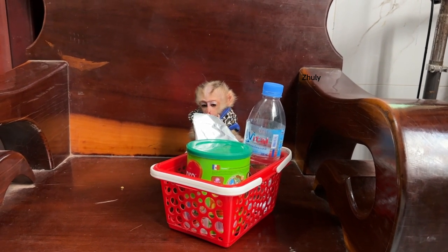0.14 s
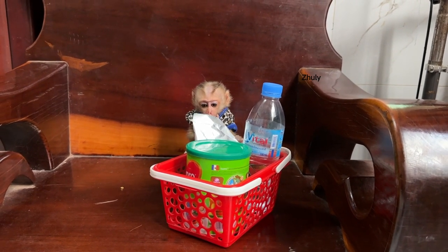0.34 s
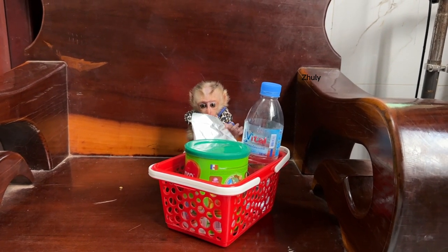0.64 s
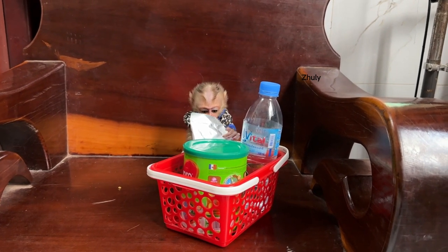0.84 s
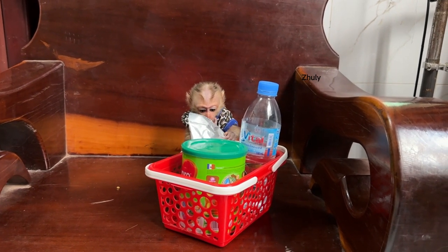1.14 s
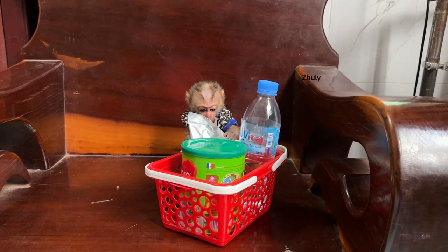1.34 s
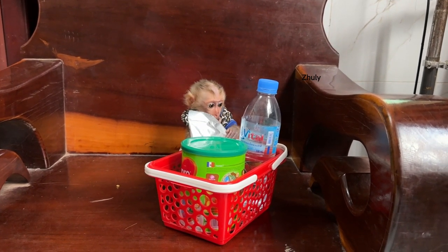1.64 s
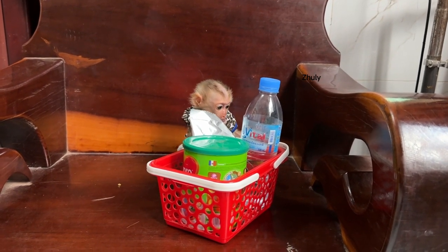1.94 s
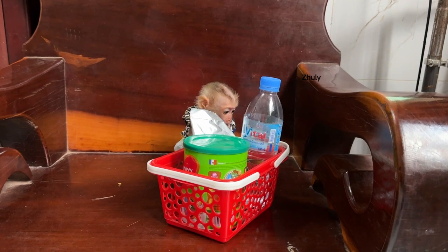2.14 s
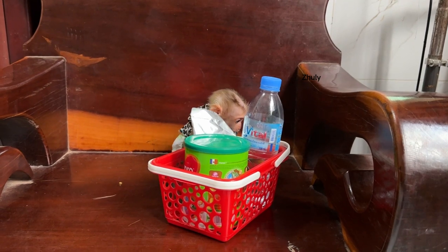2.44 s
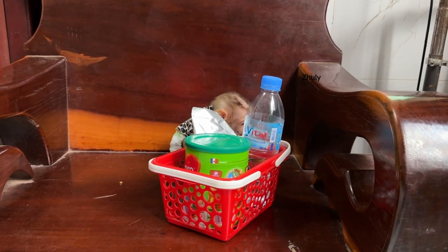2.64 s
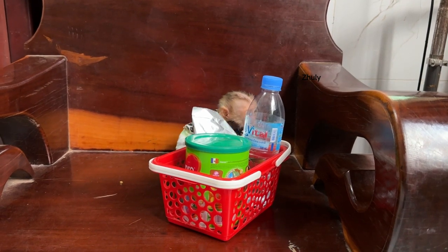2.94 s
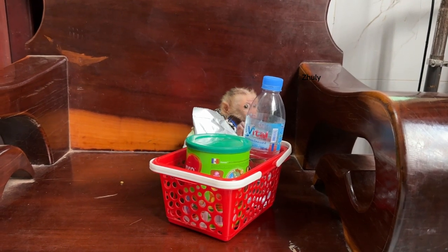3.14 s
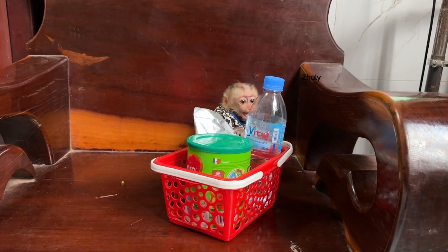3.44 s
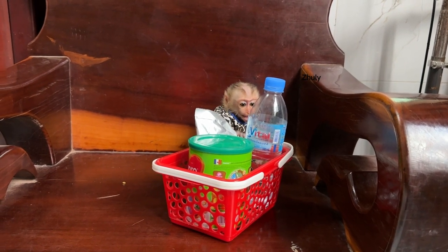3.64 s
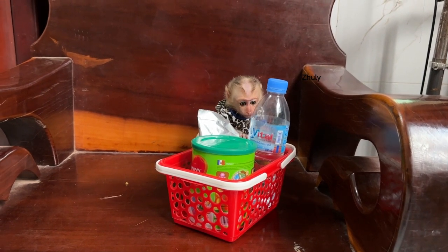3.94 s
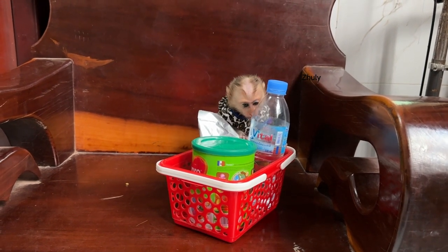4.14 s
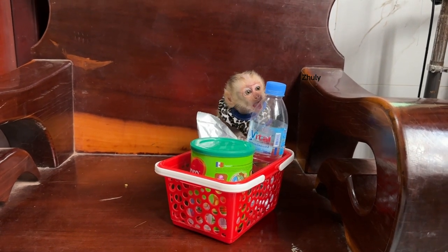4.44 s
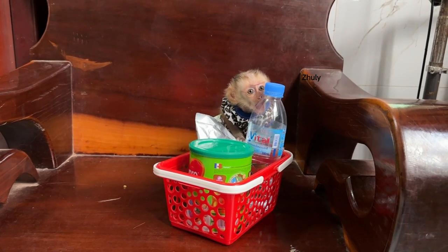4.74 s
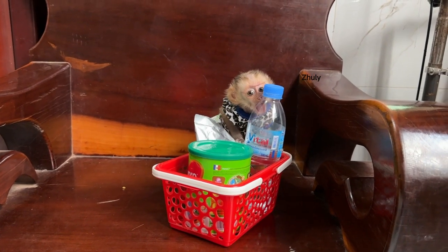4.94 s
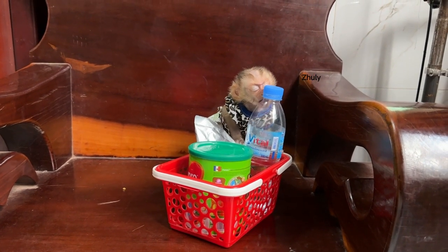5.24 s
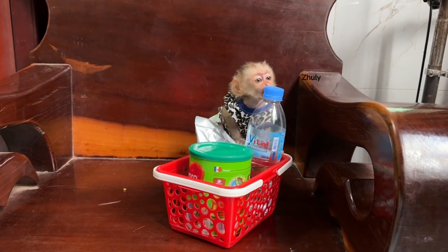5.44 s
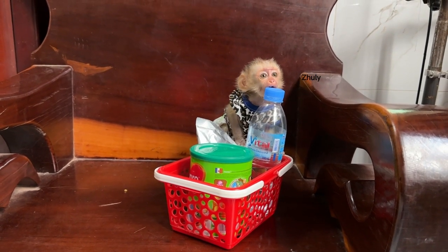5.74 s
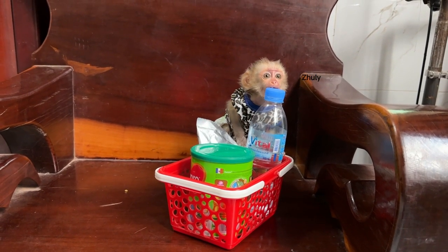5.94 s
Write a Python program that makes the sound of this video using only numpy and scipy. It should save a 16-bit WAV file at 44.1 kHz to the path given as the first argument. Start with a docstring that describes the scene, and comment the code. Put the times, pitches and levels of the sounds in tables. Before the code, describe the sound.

Soft wavering monkey coos, a sudden squeaky shriek ending in a throat click, then light ticks and one sharp snap in a hard-walled room.

```python
"""Baby monkey on a bench

A baby monkey sits in a plastic basket on a wooden bench, in a hard-walled room with a low hum.
It gives six soft, nearly pure coos built from wavering harmonics, then squeaks from three rising
harmonics break into a rasping shriek of smeared harmonics that ends with a throat click. The click, small
ticks of plastic and lips and one sharp snap are dying noise through resonances; dull bumps are low
tones; faint far chirps are falling tones heard as echoes."""
import sys
import numpy as np
from scipy import signal
from scipy.fft import rfft, irfft
from scipy.io import wavfile

SR = 44100
rng = np.random.default_rng(int(sys.argv[2]) if len(sys.argv) > 2 else 0)


def to_wav(s):
    """Save 16-bit WAV."""
    ch = np.atleast_2d(s).T  # columns
    pcm = np.round(np.clip(ch, -1, 1) * 32767)  # PCM
    wavfile.write(sys.argv[1], SR, pcm.astype(np.int16))


N = 268480
TIME = np.arange(N) / SR   # seconds
CUTOFF_HZ = 15750   # top of the sound


def from_db(db):
    """Turn decibels into gain."""
    return 10 ** (np.asarray(db) / 20)


def rms_one(x):
    """Scale to an rms of 1."""
    return x / np.sqrt(np.mean(x ** 2))


def at_hz(points, hz):
    """Read a curve of (Hz, value) points on a log-frequency axis."""
    knots, values = np.transpose(points)
    return np.interp(np.log(np.maximum(hz, 1)), np.log(knots), values)


def drift(size, rate):
    """Wander smoothly with a spread near 1: low-passed noise, faster for a higher rate in Hz."""
    r = np.exp(-2 * np.pi * rate / SR)
    wander = signal.lfilter([1], [1, -2 * r, r * r], rng.standard_normal(size + SR))
    return rms_one(wander)[SR:]   # the first second lets the filter settle


def cycles(pitch, jitter, rate):
    """Add up a trembling pitch into a phase; jitter is the tremble as a share of the pitch."""
    return 2 * np.pi * np.cumsum(pitch * (1 + jitter * drift(len(pitch), rate))) / SR


def resonate(x, hz, width):
    """Ring one resonance that has a gain of 1 at its peak."""
    r = np.exp(-np.pi * width / SR)
    feedback = [1, -2 * r * np.cos(2 * np.pi * hz / SR), r * r]
    return signal.lfilter(np.array([1, 0, -1]) * (1 - r * r) / 2, feedback, x)


def colour(x, spectrum):
    """Shape a sound by a spectrum in dB."""
    gain = from_db(at_hz(spectrum, np.fft.rfftfreq(x.shape[-1], 1 / SR)))
    return irfft(rfft(x) * gain, x.shape[-1])


def add(out, s, sound):
    """Mix a sound in at a time in seconds."""
    start = round(s * SR)
    out[start:start + len(sound)] += sound[:N - start]


def burst(t60):
    """Make a short crack of noise that falls 60 dB in t60 seconds."""
    t = TIME[:SR // 4]
    return rng.standard_normal(len(t)) * from_db(-60 * t / t60)


def arch(t, length):
    """Swell from silence to 1 and back over a length of time."""
    return np.sin(np.pi * np.clip(t / length, 0, 1))


def eased(t, times, values):
    """Move smoothly from value to value, levelling off at each."""
    steps = np.arange(len(times))
    place = np.interp(t, times, steps)
    smooth_place = np.floor(place) + (1 - np.cos(np.pi * (place % 1))) / 2
    return np.interp(smooth_place, steps, values)


def call_span(start, end, fade_s):
    """Find the sample indices of a call and its soft on-off gate."""
    at = np.flatnonzero((TIME > start - fade_s) & (TIME < end + fade_s))
    inside_s = np.minimum(TIME[at] - start, end - TIME[at])
    return at, np.clip(1 + inside_s / fade_s, 0, 1) ** 2


def gesture(rows, fade_s):
    """Draw a call's control curves through timed rows, with its sample indices and gate."""
    s, *columns = np.transpose(rows)
    at, gate = call_span(s[0], s[-1], fade_s)
    return at, gate, [np.interp(TIME[at], s, column) for column in columns]


def diffuse(size):
    """Make stereo noise from all around: a shared part and an opposed part set how alike the sides are."""
    # How alike left and right are: hz, likeness (1 = the same, 0 = unrelated)
    likeness = [(30, 1), (120, 0.69), (300, 0.71), (1000, 0), (3000, 0.17), (15000, 0)]
    alike = at_hz(likeness, np.fft.rfftfreq(size, 1 / SR))
    mid, side = rfft(rng.standard_normal((2, size)))
    shared = np.sqrt((1 + alike) / 2) * mid
    opposed = np.sqrt((1 - alike) / 2) * side
    return irfft(shared + opposed * [[1], [-1]], size)


def room(x, first_s=.003, build_s=.0035, longer=1):
    """Ring hard walls: dense echoes build up and die away at a different speed in each band."""
    # Echo decay, before "longer" stretches it: hz, t60_s (time to fall 60 dB)
    decay_times = [(300, .5), (800, 0.79), (1700, 0.75), (4500, 0.76), (8000, 0.75), (11000, 0.47),
                   (15000, 0.18)]
    # Echo strength for a sound sent at full level: hz, level_db (against the direct sound)
    echo_gain = [(300, -10.5), (800, -11), (1700, -1.5), (3300, -8), (4800, -5), (8000, -4), (10500, -12.5),
                 (15000, -9)]
    t, hz = TIME[:SR], np.fft.rfftfreq(SR, 1 / SR)
    noise, tail = rfft(diffuse(SR)), 0
    onset = 1 - np.exp(-np.maximum(t - first_s, 0) / build_s)
    for k, (_, t60) in enumerate(decay_times):
        # each band overlaps its neighbours in a triangle
        band = at_hz([(f, j == k) for j, (f, _) in enumerate(decay_times)], hz)
        decay = onset * from_db(-60 * t / (t60 * longer))
        tail = tail + irfft(noise * band, SR) * decay / np.linalg.norm(decay)
    echoes = colour(tail, echo_gain)[:, :-SR // 10]
    return signal.fftconvolve(x[None], echoes, axes=1)[:, :N]


def ports(x):
    """Reach two microphone ports: left and right get the same sound with a phase difference."""
    # Phase between the ports: hz, left_lead_radians
    port_phase = [(100, -6), (950, 0.81), (1650, -2), (2100, 1.5), (3400, 1.4), (4200, .5), (4650, 1.5),
                  (5300, 2), (8900, -1.7), (10000, -2), (12000, -5), (16000, -5.5)]
    turn = at_hz(port_phase, np.fft.rfftfreq(2 * N, 1 / SR))
    return irfft(rfft(x, 2 * N) * np.exp(1j * turn / 2 * np.array([[1], [-1]])))[:, :N]


def background(noise_db=-58.5, waver_db=3.0):
    """Lay down low room noise and a hum of low tones that waver in pitch and level."""
    # Shape of the room noise: hz, relative_level_db (per Hz)
    quiet = [(13, -34.5), (22, -11.5), (43, 2.5), (112, -8), (140, -6), (169, -14), (256, -15),
             (310, -15.5), (710, -23), (910, -20), (1670, -28.5), (2020, -32), (2820, -36), (4260, -38),
             (16000, -64.5)]
    # Hum tones, around which pitch and level waver: pitch_hz, level_db (rms)
    hum_tones = [(53, -66), (79, -67.5), (110, -71.5), (163, -71.5)]
    noise = from_db(noise_db) * rms_one(colour(diffuse(N), quiet))
    hum = 0
    for hz, db in hum_tones:
        strength = from_db(db + waver_db * drift(N, 2.8))
        hum = hum + strength * np.sin(cycles(np.full(N, hz), jitter=.015, rate=3))
    return noise + np.sqrt(2) * hum


def far_chirps(jitter=.018, lift_db=5.0, hold=2):
    """Whistle thin falling tones from afar: only their slowly swelling, lingering echoes arrive."""
    # Chirps: start_s, length_s, start_hz, end_hz, level_db (peak sent to the room, before lift_db)
    chirps = [(0.0, .06, 5580, 4800, -72.5), (0.597, 0.08, 6200, 5000, -75.5),
              (1.102, .19, 5680, 2980, -68), (2.284, 0.042, 5450, 4540, -63.5),
              (2.681, 0.077, 6150, 5380, -78), (3.184, .08, 5200, 4590, -66.5),
              (5.39, .15, 5734, 3090, -66.5), (5.438, 0.071, 2900, 2590, -68)]
    out = np.zeros(N)
    for s, length, start_hz, end_hz, db in chirps:
        # a higher power holds the top note longer before the fall
        fall = np.linspace(0, 1, int(length * SR)) ** hold
        pitch = start_hz + (end_hz - start_hz) * fall
        whistle = signal.windows.tukey(len(pitch)) * np.sin(cycles(pitch, jitter, rate=300))
        add(out, s, from_db(db + lift_db) * whistle)
    return room(out, build_s=0.049, longer=1.4)


def bumps(t60=0.28, rise_s=.006):
    """Shift the monkey's weight: the wooden seat answers with a soft, low, dying tone."""
    # Bumps: start_s, pitch_hz, level_db (where the decay starts; the soft rise keeps the peak lower)
    seat_bumps = [(1.129, 96, -51.5), (3.53, 153, -53), (3.708, 133.6, -51.5), (3.801, 161, -64),
                  (4.67, 146.6, -52)]
    out, t = np.zeros(N), TIME[:SR // 2]
    for s, hz, db in seat_bumps:
        swell = 1 - np.exp(-t / rise_s)
        add(out, s, from_db(db - 60 * t / t60) * swell * np.sin(2 * np.pi * hz * t))
    return out


def ticks(t60=0.034, crack_hz=7000, crack_width_hz=5000, crack_gain_db=1.0):
    """Small dry ticks of plastic and lips, and a throat click as the shriek ends: a knock and a bright crack."""
    # Ticks, with the throat click at 3.529 s: start_s, peak_db, resonance_hz,
    # width_hz (half the width of each of two passes), crack_db (against the knock, before crack_gain_db)
    tick_rows = [(0.74, -54.5, 1460, 1540, -31), (0.980, -56.5, 2200, 1210, -22),
                 (1.001, -51.5, 1820, 1370, -9.5), (1.128, -56, 1190, 495, -28),
                 (1.27, -58, 2030, 250, -45), (1.520, -53.5, 1440, 900, -33),
                 (1.705, -60, 900, 1200, -14.5), (3.529, -40, 1149, 350, -15),
                 (4.071, -50, 1295, 1390, -16), (4.679, -59.5, 1312, 1520, -13),
                 (4.966, -42.5, 950, 751, -16), (5.224, -51, 1100, 900, -16), (5.714, -48, 2510, 330, -34),
                 (5.81, -55, 2360, 280, -40), (6.031, -56.5, 3940, 1960, -9)]
    out = np.zeros(N)
    for s, db, hz, width, crack_db in tick_rows:
        noise = burst(t60)
        knock = resonate(resonate(noise, hz, 2 * width), hz, 2 * width)
        crack = resonate(noise, crack_hz, crack_width_hz)
        tick = knock + from_db(crack_db + crack_gain_db) * crack
        add(out, s, from_db(db) * tick / np.abs(tick).max())
    return out


def snap(start_s=4.273, level_db=-42.5, t60=0.092):
    """Crack once, sharply: one noise burst rings several resonances with deep valleys between."""
    # Resonances of the snap: hz, width_hz, relative_level_db
    modes = [(950, 750, -0.5), (3090, 300, 9.5), (5000, 250, 10.5), (6650, 1070, -7), (9080, 1160, 3.5),
             (13000, 4000, -11)]
    out, crack = np.zeros(N), burst(t60)
    ring = sum(from_db(db) * resonate(crack, hz, width) for hz, width, db in modes)
    add(out, start_s, from_db(level_db) * ring)
    return out


def squeaks(jitter=0.035, shimmer_db=4.5, glide_ease=2, swell_power=.8):
    """Whistle upward through tight folds: three harmonics tremble in pitch and strength under strain."""
    # Squeaks: start_s, length_s, start_hz, end_hz, first_db, second_db, third_db (harmonics, rms at
    # the top of the swell, before the tremble), roughness (0-1)
    glides = [(3.342, 0.024, 3820, 4353, -32.5, -54, -73.5, 0.1),
              (3.361, .024, 4500, 6216, -37, -37, -69.5, 0.5),
              (3.422, 0.017, 4520, 4740, -42.5, -45.5, -27, .35),
              (3.437, .016, 4500, 4630, -48, -33, -47.5, .35), (3.487, .013, 3750, 4560, -51, -40, -50, .5)]
    out = np.zeros(N)
    for s, length, start_hz, end_hz, *levels, rough in glides:
        t = TIME[:int(length * SR)]
        # a higher power levels the glide off sooner
        pitch = end_hz + (start_hz - end_hz) * (1 - t / length) ** glide_ease
        phase = cycles(pitch, jitter * rough, rate=770)
        tremble = from_db(shimmer_db * rough * drift(len(t), 460))
        strength = arch(t, length) ** swell_power * tremble
        harmonics = sum(from_db(db) * np.sin((k + 1) * phase) for k, db in enumerate(levels))
        add(out, s, np.sqrt(2) * strength * harmonics)
    return out


def shriek(rows, jitter=0.0037, noise_share=0.6, focus_db=10.5, shudder_db=1.0, tear_db=1.5):
    """Slap the folds shut irregularly: a rough harmonic stack is focused by a moving resonance."""
    # The wide-open mouth: hz, gain_db
    mouth = [(1200, -0.5), (1900, -18), (3000, 0.5), (3350, -6.5), (4600, 4.5), (5400, 0), (6700, -3),
             (7700, -2), (8500, 3.5), (10000, 4), (12200, -2), (13200, -1.5), (14200, -2.5), (15500, -0.5)]
    # Spells in which the low tone at the voice's pitch breaks through: start_s, length_s, peak_db (rms)
    low_tones = [(3.446, 0.025, -49), (3.494, .04, -44)]
    at, gate, (pitch, level_db, centre) = gesture(rows, fade_s=0.0035)
    phase, size = cycles(pitch, jitter, rate=400), len(at)
    rasp, power = 0, 0
    for k in range(2, 26):
        octaves = np.log2(k * pitch / centre)
        gain_db = at_hz(mouth, k * pitch) - focus_db * np.tanh(octaves ** 2)
        gain = from_db(gain_db) * (k * pitch < CUTOFF_HZ)
        # each harmonic is part steady, part smeared by chaotic vibration
        steady = np.sqrt(2 * (1 - noise_share)) * np.sin(k * phase + rng.uniform(0, 2 * np.pi))
        smeared = drift(size, 500) * np.sin(k * phase) + drift(size, 500) * np.cos(k * phase)
        rasp = rasp + gain * (steady + np.sqrt(noise_share) * smeared)
        power = power + gain ** 2
    strength = from_db(level_db + shudder_db * drift(size, 350) + tear_db * drift(size, 110))
    low = sum(from_db(db) * arch(TIME[at] - s, length) for s, length, db in low_tones)
    out = np.zeros(N)
    out[at] = gate * (strength * rasp / np.sqrt(power) + np.sqrt(2) * low * np.sin(phase))
    return out


def coo_controls(t, length, crest_s, sag_s, crest_hz, sag_hz, second_hz, db, octave_db, over_db,
                 swell_db, brighten_db, rise_hz_per_s=1500, sink_hz_per_s=950,
                 attack_s=.011, attack_db=8, release_s=.011, release_db=12, drop_hz=90,
                 push_db=1, push_overtones_db=2, overtone_share=.27):
    """Steer one coo: each push lifts pitch and levels, then the folds let go and pitch and level drop."""
    second_s = sag_s + .5 * (length - sag_s)   # second crest halfway from the sag to the end
    times = [0, crest_s, sag_s, second_s, length]
    release = np.clip(1 + (t - length) / release_s, 0, 1) ** 2
    start_hz = crest_hz - rise_hz_per_s * crest_s
    end_hz = second_hz - sink_hz_per_s * (length - second_s)
    pitch = eased(t, times, [start_hz, crest_hz, sag_hz, second_hz, end_hz]) - drop_hz * release
    push = eased(t, times, [0, 1, 0, 1, 0]) - .5
    onset_db = -attack_db * np.exp(-np.maximum(t, 0) / attack_s)   # a coo starts soft
    progress = t / length - .5
    bright_db = brighten_db * progress
    low_db = db + onset_db + swell_db * progress + push_db * push - release_db * release
    second_db = octave_db + onset_db + bright_db
    upper_db = over_db + onset_db + overtone_share * bright_db
    upper_db = upper_db + push_overtones_db * push - release_db * release / 2
    return pitch, low_db, second_db, upper_db


def coo(start, length, *shape, roughness, jitter=0.011, shimmer_db=1.3, flutter_db=4.0, air_db=2.5,
        fresh_share=.35, tense_hz=900, tense_db_per_hz=.2782):
    """Sing a strong fundamental with weak overtones and a little turbulence through the throat."""
    # Throat, for the upper overtones and the turbulence: hz, gain_db
    throat = [(600, -12), (1350, 2.5), (1650, -2), (2050, -23.5), (2400, -11), (2850, -11.5), (3250, 1),
              (3700, -1), (4300, -1), (4750, -11.5), (5600, -24.5), (6800, -22.5), (8000, -16), (8900, -4),
              (9700, -17.5), (11000, -22), (13800, -18.5), (15300, -37)]
    # Spells in which the folds beat strong-weak, adding a tone at 1.5 times the pitch:
    # centre_s, length_s, peak_db (rms)
    hoarse = [(2.284, 0.029, -54.5), (2.617, 0.017, -67), (2.946, .02, -68)]
    at, gate = call_span(start, start + length, fade_s=.003)
    t, size = TIME[at] - start, len(at)
    pitch, low_db, second_db, over_db = coo_controls(t, length, *shape)
    # a coo starts with a share of its roughness and frays towards its end
    rough = roughness * np.interp(t, [0, length], [fresh_share, 1])
    # quick jitter leaves the fundamental clean and blurs the highest overtones
    phase = cycles(pitch, jitter * rough, rate=240)
    fundamental = from_db(low_db + shimmer_db * rough * drift(size, 37)) * np.sin(phase)
    octave = from_db(second_db) * np.sin(2 * phase)
    # tense folds at high pitch strengthen the highest overtones most
    upper, tense_db = 0, tense_db_per_hz * np.maximum(pitch - tense_hz, 0)
    for k in range(3, 22):
        # overtones swell as they glide through the throat's resonances
        gain_db = at_hz(throat, k * pitch) + tense_db * (k * pitch / CUTOFF_HZ) ** 2
        gain = from_db(gain_db + flutter_db * drift(size, 40))
        upper = upper + gain * (k * pitch < CUTOFF_HZ) * np.sin(k * phase)
    # turbulence comes in puffs, one each time the folds open
    air = colour(rng.standard_normal(size), throat) * (1 + np.cos(phase))
    voice = fundamental + octave + from_db(over_db) * (upper + from_db(air_db) * rough * air)
    for s, spell, half_db in hoarse:
        swell = np.exp(-(2 * (TIME[at] - s) / spell) ** 2)
        voice += from_db(half_db) * swell * np.sin(phase + phase / 2)
    out = np.zeros(N)
    out[at] = np.sqrt(2) * gate * voice
    return out


def scene(coo_wet_db=-1.5, tick_wet_db=-7.5, snap_wet_db=8.5):
    """Place the monkey close to the microphone and let its sounds ring in the room."""
    # Coos, each two pushes of the voice with a sag between: start_s, length_s, first_crest_s and
    # sag_s (after the start), first_crest_hz, sag_hz, second_crest_hz, fundamental_db, octave_db,
    # overtones_db (levels before the push, swell, attack and release), swell_db and
    # brightening_db (change over the call; upper overtones take part of it), roughness (0-1)
    coo_rows = [(-0.015, 0.14, 0.037, 0.076, 851.4, 802.6, 819, -42.5, -62.5, -71.5, -2, -6.5, .35),
                (0.282, 0.14, 0.024, 0.078, 812.5, 759.6, 806.3, -41, -59, -67.5, -1.5, -1, 0.3),
                (1.9, .166, 0.011, 0.062, 981, 848, 891, -39.5, -66.5, -69, 3, -5, 0.65),
                (2.192, 0.13, 0.039, 0.08, 847, 812.5, 842.7, -38.7, -55, -60.5, 0.5, 13, 0.64),
                (2.484, .152, .015, .07, 886, 795, 823.7, -39.5, -50, -62, 1, 6, 0.7),
                (2.804, 0.17, .012, 0.065, 918, 766.6, 834.6, -40, -47.5, -62, 6, 4, 0.6)]
    # A short rough catch, then the shriek, both as: time_s, pitch_hz, rasp_db (rms, before it
    # shudders), rasp_centre_hz
    catch_rows = [(3.362, 1006, -52, 7570), (3.381, 1025, -42.5, 7420), (3.388, 1010, -54.5, 8000)]
    shriek_rows = [(3.421, 1003, -48.5, 12500), (3.437, 984.3, -38.5, 13500), (3.455, 891.5, -32, 11200),
                   (3.483, 813.7, -39, 9600), (3.5, 776, -28.5, 11000), (3.516, 766, -29, 9800),
                   (3.531, 708, -32.5, 5000), (3.545, 685.6, -40, 5500)]
    # The coos lean right as the head turns: time_s, left_minus_right_db
    coo_pan = [(.4, 0.5), (2.0, -1), (2.3, -1), (2.9, -1.5)]
    coos = sum(coo(*row, roughness=roughness) for *row, roughness in coo_rows)
    cry = squeaks() + shriek(catch_rows) + shriek(shriek_rows)
    small_ticks, crack = ticks(), snap()
    lean_db = np.interp(TIME, *np.transpose(coo_pan))
    lean = from_db(lean_db / 2 * np.array([[1], [-1]]))
    direct = ports(coos) * lean + ports(cry + small_ticks + crack)
    sent = from_db(coo_wet_db) * coos + cry
    sent = sent + from_db(tick_wet_db) * small_ticks + from_db(snap_wet_db) * crack
    return direct + room(sent) + far_chirps() + bumps() + background()


def record(dry, low_cut_hz=31):
    """Pass the microphone: it loses the deepest bass, and the top is cut steeply."""
    dry = signal.sosfilt(signal.butter(4, low_cut_hz, "high", fs=SR, output="sos"), dry)
    return signal.sosfilt(signal.ellip(10, .2, 70, CUTOFF_HZ, fs=SR, output="sos"), dry)


dry = scene()
out = record(dry)
to_wav(out)
```